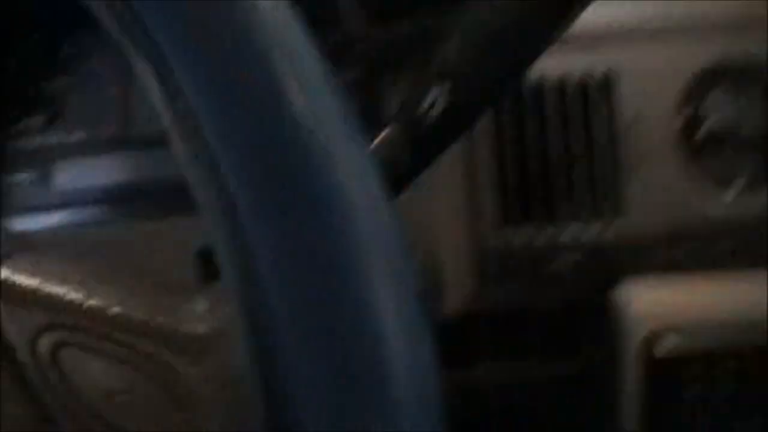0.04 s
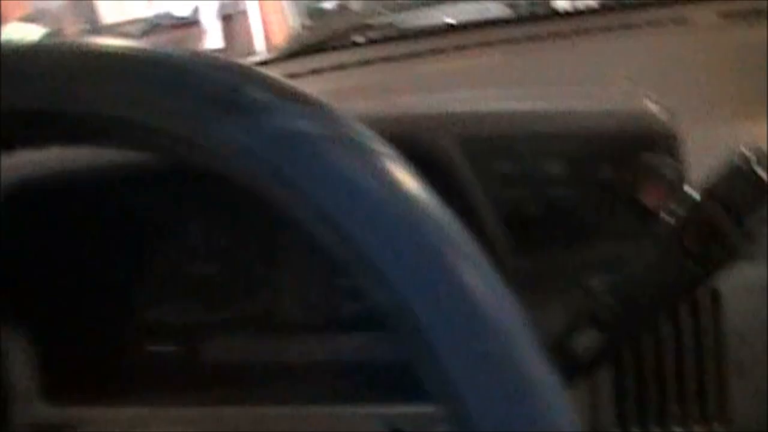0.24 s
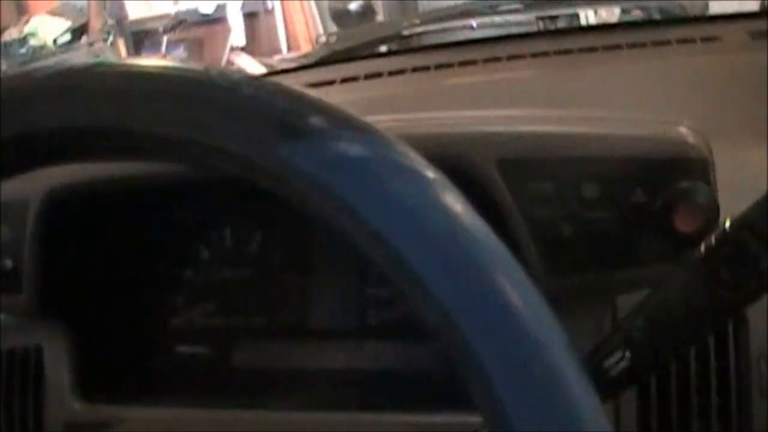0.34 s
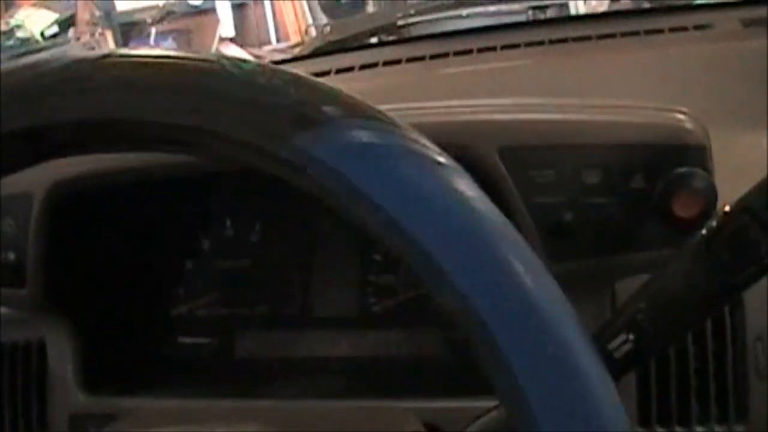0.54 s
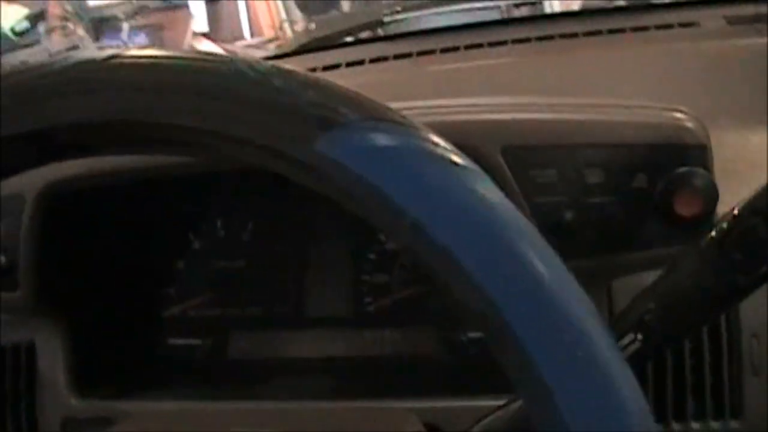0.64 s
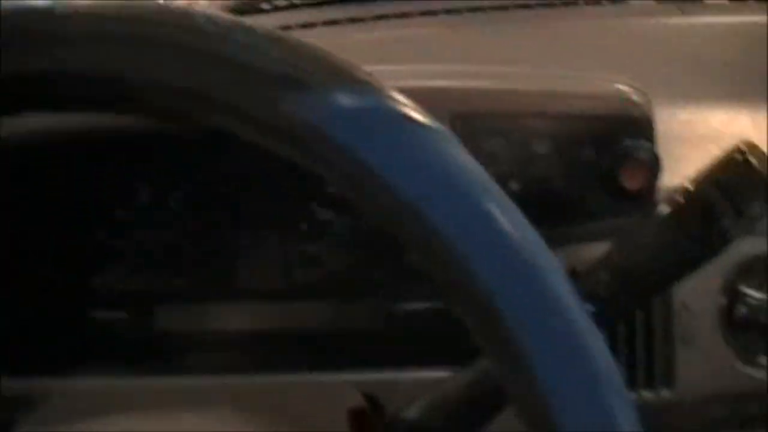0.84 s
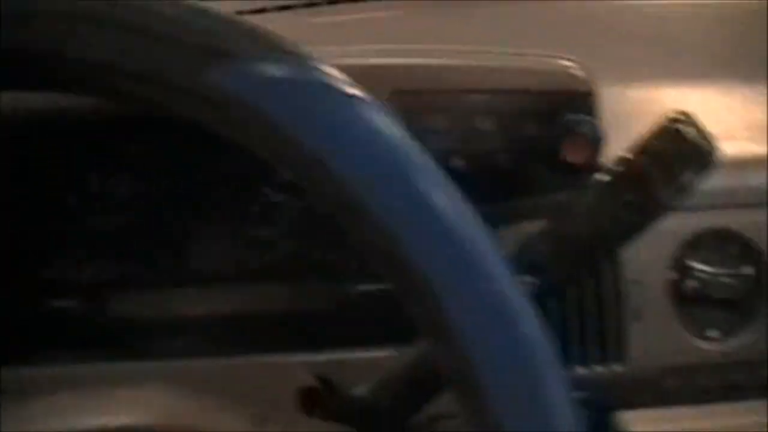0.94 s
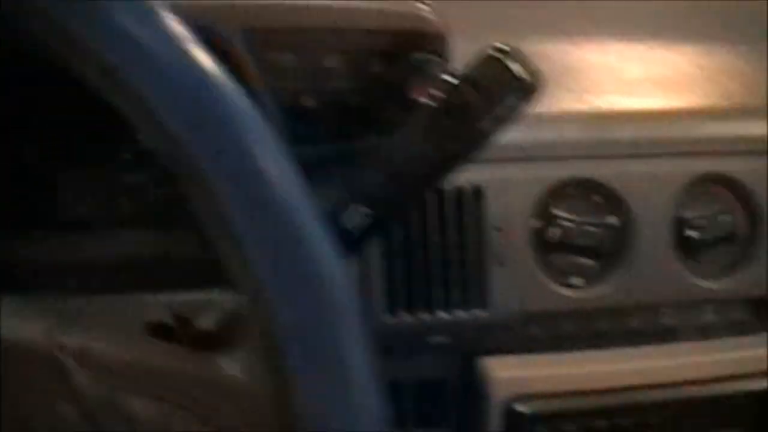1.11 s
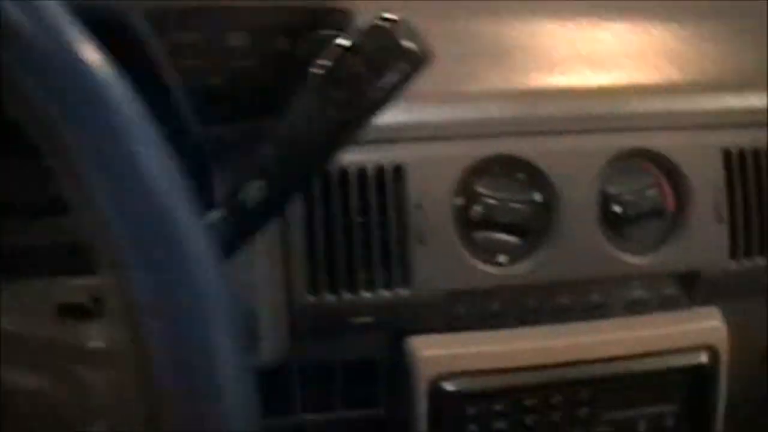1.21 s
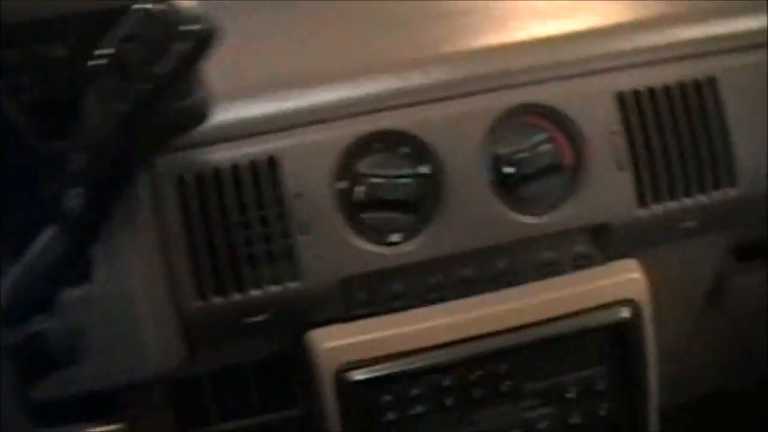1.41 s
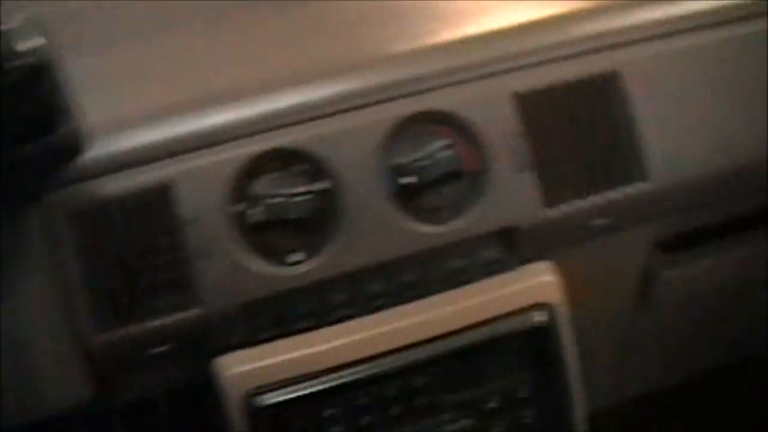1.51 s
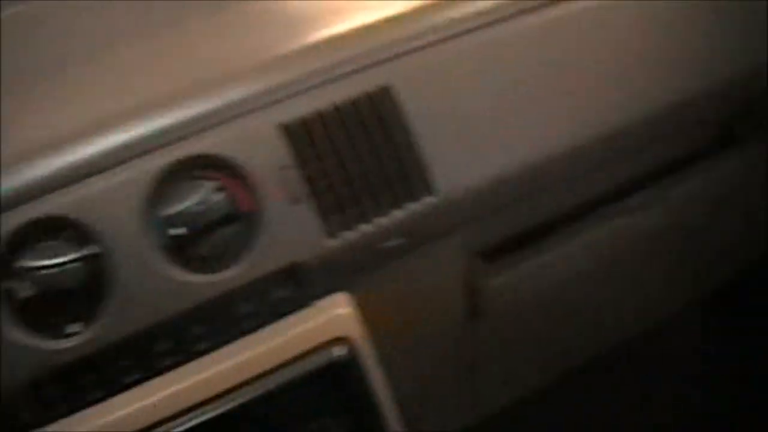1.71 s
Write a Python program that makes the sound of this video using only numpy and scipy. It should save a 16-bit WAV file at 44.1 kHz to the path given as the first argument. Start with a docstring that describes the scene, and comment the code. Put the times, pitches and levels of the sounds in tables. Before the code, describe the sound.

Keys jingle in bright flurries inside a parked truck cabin after the door slams and booms

```python
"""In the cabin of a parked truck someone settles in: clothes rustle, the door judders and thuds shut, the air booms.
Close to the microphone a ring of keys clashes in flurries, slides and clicks dryly; fingers rub on it.
Loose trim rattles after the thud and a soft knock on the trim comes near the end, over a faint background.
Struck bodies are decaying sines plus dying noise bursts; friction is coloured noise under a moving level;
the boom is one low sine with rumble."""
import sys
import numpy as np
from scipy.fft import rfft, irfft, next_fast_len
from scipy.io import wavfile
from scipy.ndimage import uniform_filter1d

SR = 44100
rng = np.random.default_rng(int(sys.argv[2]) if len(sys.argv) > 2 else 0)


def file_out(sig):
    """Save sig as 16-bit WAV at sys.argv[1]."""
    # one column per channel
    cols = np.atleast_2d(sig).T
    # limit, then scale
    lim = np.clip(cols, -1, 1)
    pcm = np.round(lim * 32767).astype(np.int16)
    wavfile.write(sys.argv[1], SR, pcm)


N = 77175  # length in samples
T = np.arange(8192) / SR  # time within one impact, s


def amp(db):
    """Decibel law: level to amplitude ratio."""
    return 10 ** (np.asarray(db) / 20)


def unit(x):
    """Normalization to an rms of 1."""
    return x / np.sqrt(np.mean(x ** 2) + 1e-20)


def along(points, hz):
    """Interpolation of (pitch_hz, value) points on a logarithmic frequency axis."""
    f, v = np.transpose(points)
    return np.interp(np.log(hz + 1), np.log(f + 1), v)


def level(rows):
    """Amplitude envelope: gain per sample, interpolated in decibels from (start_s, level_db) rows."""
    return amp(np.interp(np.arange(N) / SR, *np.transpose(rows)))


def fade(t60):
    """Exponential decay: 60 dB down after t60 seconds."""
    return np.exp(-np.log(1000) * T / t60)


# Likeness of the left and right noise: pitch_hz, correlation
EAR_LIKENESS = [(100, .98), (600, 0.89), (1500, 0.81), (3000, 0.89), (6000, 0.61), (11000, 0.064)]
PARTIAL_WIDTH_HZ = 110


def noise(spectrum, size, ripple_db=0):
    """Filtered noise, rms 1: mid and side shares set the stereo correlation, ripple forms random partials."""
    hz = np.fft.rfftfreq(size, 1 / SR)
    turn = np.arccos(np.clip(along(EAR_LIKENESS, hz), -1, 1)) / 2
    knots = SR // PARTIAL_WIDTH_HZ
    ripple = np.interp(hz / PARTIAL_WIDTH_HZ, np.arange(knots), rng.standard_normal(knots))
    colour = amp(along(spectrum, hz) + ripple_db * ripple)
    white = rfft(rng.standard_normal((2, size)))
    mid, side = irfft(white * colour * [np.cos(turn), np.sin(turn)], size)
    return unit(np.array([mid + side, mid - side]))


def burst(spectrum, t60):
    """High modal density: a dying crowd of modes acts as decaying noise, starting at rms 1."""
    x = noise(spectrum, len(T)) * fade(t60)
    return unit(x) * np.sqrt(np.mean(fade(t60) ** 2))


def add(track, s, x):
    """Superposition: mix x into the track at time s."""
    part = track[:, max(round(s * SR), 0):][:, :x.shape[-1]]
    part += x[..., :part.shape[1]]


def blows(rows, spectrum, t60, modes=(), rise_s=0.00048):
    """Impact excitation: each blow is a fresh burst plus the modal ring of the struck body."""
    out = np.zeros((2, N))
    ring = sum(amp(mode_db) * fade(life) * np.sin(2 * np.pi * hz * T) for hz, mode_db, life in modes)
    attack = 1 - np.exp(-T / rise_s)  # a longer rise is a softer contact
    for s, db in rows:
        add(out, s, amp(db) * attack * (burst(spectrum, t60) + ring))
    return out


def soft_ring(hz, rise, t60):
    """Single-mode resonance with a rounded attack."""
    return (1 - np.exp(-T / rise)) * fade(t60) * np.sin(2 * np.pi * hz * T)


def grainy(spectrum, grain_db, size):
    """Amplitude modulation: random smoothed level swings make noise grainy; size in samples, rms 1."""
    swing = unit(uniform_filter1d(rng.standard_normal(N), size=size))
    return unit(amp(grain_db * swing) * noise(spectrum, N))


# Spectrum of the faint background: pitch_hz, level_db
FLOOR = [(25, -3), (200, -6), (384, -2), (545, -8), (1800, -14), (5000, -19), (11000, -17.5), (16000, -34)]


def background():
    """Stationary noise: a faint, steady floor."""
    return amp(-49) * noise(FLOOR, N)


# Clothes rubbing on the seat: start_s, level_db
RUSTLING = [(0, -35.5), (.11, -35), (.17, -30.5), (.23, -30.5), (.26, -27.5), (.285, -23), (.31, -27.5),
            (.35, -27), (.45, -28.5), (.52, -32), (.6, -40.5), (.7, -43), (.76, -50), (1.2, -52.5),
            (1.75, -56.5)]
# Spectrum of the rubbing cloth: pitch_hz, level_db
CLOTH = [(40, -13), (150, -1.5), (400, -0.5), (700, -4.5), (1000, -2.5), (1800, -8.5), (3000, -16),
         (7000, -22.5), (11000, -25), (15000, -46)]
# Quick sleeve strokes: start_s, length_s, level_db
SWISHES = [(0.237, 0.079, -33), (0.424, 0.044, -31.5)]
# Spectrum of the sleeve strokes: pitch_hz, level_db
SWISH = [(1000, -6), (4000, -4), (7500, -0.5), (11000, -5.5), (15000, -24)]


def clothes():
    """Friction noise: grainy rubbing on the seat, with brighter swishes that swell and sink."""
    t = np.arange(N) / SR
    strokes = np.zeros(N)
    for s, length, db in SWISHES:
        progress = np.clip((t - s) / length, 0, 1)
        strokes += amp(db) * np.sqrt(np.abs(np.sin(np.pi * progress)))
    rubbing = grainy(CLOTH, grain_db=1.56, size=200)
    return rubbing * level(RUSTLING) + strokes * noise(SWISH, N)


# Hands and seat shifting: start_s, level_db
SHIFTING = [(0, -42), (.22, -43.5), (.29, -36), (.36, -39.5), (.7, -45), (.95, -50), (1.1, -50),
            (1.2, -42.5), (1.32, -46.5), (1.42, -48), (1.55, -59), (1.68, -52.5), (1.75, -47.5)]
# Spectrum of the shifting: pitch_hz, level_db
SHIFT = [(20, -14), (60, -9), (110, 2), (200, -8), (280, -8.5), (390, -3), (550, -9.5), (1200, -20.5),
         (4000, -34)]


def shifting():
    """Friction noise, low and hollow, as the person moves."""
    return noise(SHIFT, N) * level(SHIFTING)


# Ringing modes of the keys: pitch_hz, level_db (relative), t60_s
KEY_MODES = [(2130, -20, 0.04), (5350, -18, 0.17), (6520, -14.5, 0.12), (6910, -7, 0.13), (7870, -8.5, .08),
             (8750, -7.5, 0.093), (9270, -16, 0.11), (10840, 1.5, 0.055), (11180, -3.5, 0.1),
             (11400, -0.5, 0.096), (12000, -9, 0.072), (13300, -10, .1), (14700, -17, .11),
             (15250, -14, .11)]
# Spectrum of the keys' crowd of short-lived modes: pitch_hz, level_db
CLINK = [(300, -32), (1500, -24), (2200, -14.5), (3200, -16), (4800, -12), (6700, -2.5), (9800, -2.5),
         (11200, 3.5), (12300, 0), (13800, -9), (15000, -6.5), (16000, -12)]
RING_DB, KEY_DETUNE, MODE_SCATTER_DB = -1.5, .0025, 4.5  # detune: relative spread of each mode's pitch
CLINK_DB, CLINK_T60_S, TICK_DB, TICK_T60_S = -0.06, 0.066, -13.52, 0.0059


def key_strike():
    """Modal superposition: a tick, a short clink and ringing modes that differ at each ear."""
    hz, db, t60 = np.transpose(KEY_MODES)[:, :, None]
    gain = unit(amp(db + MODE_SCATTER_DB * rng.standard_normal(hz.shape)))
    gain = gain / np.sqrt(len(hz) / 2)  # summed modes start near rms 1
    detuned_hz = hz * (1 + KEY_DETUNE * rng.standard_normal(hz.shape))
    cycles = detuned_hz * T + rng.random((2, len(hz), 1))  # random phase per ear
    ring = (gain * fade(t60) * np.sin((2 * np.pi * cycles).astype(np.float32))).sum(axis=1)
    decay = amp(CLINK_DB) * fade(CLINK_T60_S) + amp(TICK_DB) * fade(TICK_T60_S)
    clink = noise(CLINK, len(T), ripple_db=6) * decay  # each contact favours its own partials
    return amp(RING_DB) * ring + clink


# How hard the keys slide over each other: start_s, level_db
SLIDING = [(0, -77), (.5, -55), (.57, -30), (.6, -55), (.715, -66), (.73, -39), (.76, -40), (.785, -28),
           (.815, -48), (.85, -33), (.9, -32), (.96, -29), (1.0, -36.5), (1.1, -30), (1.15, -32.5),
           (1.25, -53), (1.285, -30), (1.308, -40), (1.32, -30), (1.35, -26.5), (1.4, -31.5), (1.44, -25),
           (1.48, -29), (1.5, -48), (1.58, -40), (1.64, -42), (1.72, -58), (1.75, -62)]
CONTACTS_PER_S, CONTACT_SCATTER_DB = 480, 3


def key_sliding(count=12):
    """Friction as a random train of small impacts, drawn in turn from a few strikes."""
    out, sliding = np.zeros((2, N)), level(SLIDING)
    strikes = [key_strike() for _ in range(count)]
    energy = np.mean(np.sum(np.square(strikes), axis=2))
    scale = np.sqrt(SR / CONTACTS_PER_S / energy)  # brings the dense patter near rms 1
    for k in range(round(N / SR * CONTACTS_PER_S)):
        s = (k + 2 * rng.random()) / CONTACTS_PER_S
        scatter_db = CONTACT_SCATTER_DB * (rng.exponential() - 2)  # few contacts are strong
        if s * SR < N:
            add(out, s, scale * sliding[int(s * SR)] * amp(scatter_db) * strikes[k % count])
    return out


# Keys clashing: start_s, level_db
CLASHES = [(.097, -45), (0.124, -35), (.134, -32), (.149, -31), (0.524, -32.5), (.534, -30.5),
           (.552, -34.5), (0.57, -27.5), (0.596, -37), (.621, -25.5), (.717, -30.5), (0.763, -23.5),
           (.769, -16.5), (.774, -16.5), (0.785, -19.5), (.797, -14.5), (.802, -19.5), (.871, -24.5),
           (.876, -19.5), (.887, -30), (0.917, -28), (.9255, -26), (.942, -20.5), (0.9454, -14.5),
           (.953, -16.5), (.959, -22), (.97, -25), (1.015, -26), (1.039, -29.5), (1.079, -24.5),
           (1.085, -20), (1.091, -24), (1.106, -23.5), (1.116, -32), (1.152, -32), (1.161, -31.5),
           (1.203, -32), (1.207, -28.5), (1.218, -30.5), (1.274, -32.5), (1.286, -31), (1.313, -27),
           (1.336, -31), (1.345, -28), (1.352, -24), (1.4093, -17), (1.428, -24), (1.44, -21.5),
           (1.449, -26), (1.461, -25.5), (1.478, -25.5), (1.61, -29), (1.628, -36.5), (1.666, -33),
           (1.673, -33), (1.742, -44)]
# A single key or the ring singing out: start_s, pitch_hz, level_db
PINGS = [(.569, 6580, -24.5), (.947, 2064, -22.5), (1.04, 4420, -24.5), (1.668, 13480, -30)]
# Dry clicks of keys held tight: start_s, level_db
CLICKS = [(.395, -16), (.463, -21), (.575, -27), (.795, -21), (.881, -32), (.949, -24.5), (1.015, -29),
          (1.071, -19), (1.0845, -24), (1.1823, -27.5), (1.2736, -26), (1.286, -31), (1.522, -35),
          (1.5435, -29), (1.5538, -21.5), (1.559, -31), (1.611, -36), (1.627, -32)]
# Spectrum of dry contact, for clicks and fingers: pitch_hz, level_db
CLICK = [(200, -29), (900, -7.5), (1600, -5.5), (2300, -2), (3500, -2.5), (6000, -1), (10000, -7.5),
         (16000, -19)]
KEY_LEFT_DB = 1.2  # left up and right down by this much


def keys():
    """Modal excitation: clashes and pings ring freely over the sliding; damped clicks do not ring."""
    out = key_sliding()
    for s, db in CLASHES:
        add(out, s, amp(db) * key_strike())
    for s, hz, db in PINGS:
        add(out, s, amp(db) * soft_ring(hz, rise=0.0013, t60=.045))
    clicks = blows(CLICKS, CLICK, t60=0.022, rise_s=.0001)
    return out * amp([[KEY_LEFT_DB], [-KEY_LEFT_DB]]) + clicks


# The door sticking and slipping as it swings: start_s, level_db
SLIPS = [(.174, -26), (.183, -13), (.1917, -15), (0.2001, -15), (.209, -19.5), (.217, -33)]
# Spectrum of a slip: pitch_hz, level_db
SLIP = [(40, -22), (120, -10), (220, -10.5), (350, 3.5), (650, -10), (950, -2.5), (1150, -6.5),
        (1450, -5.5), (2400, -20), (5000, -26), (10000, -26), (15000, -41)]
# Ringing modes of a slip: pitch_hz, level_db, t60_s
SLIP_MODES = [(117, -3.5, 0.051), (270, -7.5, 0.044), (372, 0, 0.018), (970, -2, 0.04)]
SLIP_T60_S, SLIP_ALIKE = 0.043, 0.63  # alike: power share of the burst and ring that repeats


def door_judder():
    """Stick-slip: slips excite the same resonances a little differently, giving a rough low pitch."""
    out = np.zeros((2, N))
    body = blows([(0.00026, 0)], SLIP, SLIP_T60_S, SLIP_MODES)[:, :len(T)]
    for s, db in SLIPS:
        fresh = burst(SLIP, SLIP_T60_S)
        add(out, s, amp(db) * (np.sqrt(SLIP_ALIKE) * body + np.sqrt(1 - SLIP_ALIKE) * fresh))
    return out


# The latch catching: start_s, level_db
LATCH_HITS = [(.3725, -16), (.376, -2.5), (.381, -11), (.387, -8), (.392, -5.5), (.398, -8.5), (.429, -13),
              (.435, -15), (.448, -18)]
# Spectrum of a latch hit: pitch_hz, level_db
LATCH = [(40, -19), (180, -1), (420, -4), (620, 3), (780, 4), (1000, -10), (1700, -10.5), (2400, -13.5),
         (3500, -28), (7000, -29.5), (11000, -34), (15000, -52)]
# Ringing modes of the latch: pitch_hz, level_db, t60_s
LATCH_MODES = [(439.2, -14.5, 0.16), (586.2, -9, 0.19), (711, -14, 0.17), (773, -14.5, 0.096)]


def door_latch():
    """Impact excitation: a quick run of hits rings the latch modes."""
    return blows(LATCH_HITS, LATCH, t60=0.039, modes=LATCH_MODES)


# The cabin air booming after the door shuts: start_s, level_db
BOOMING = [(0, -57), (.355, -56), (.38, -21.5), (.48, -23.5), (.555, -14.5), (.595, -25.5), (.65, -23),
           (.71, -25), (.745, -36.5), (.82, -34.5), (.87, -50), (.92, -39), (1.15, -49), (1.3, -56),
           (1.75, -62)]
BOOM_HZ, RUMBLE_DB = 51.04, -4  # rumble rms relative to the tone


def cabin_boom():
    """Cavity resonance: the shut-in air swells at its lowest mode and dies away with some rumble."""
    tone = unit(np.sin(2 * np.pi * BOOM_HZ * np.arange(N) / SR))
    rumble = noise([(15, -12), (30, -4.5), (60, -2), (110, -2), (210, -7.5), (350, -25.5), (2000, -76)], N)
    return level(BOOMING) * (tone + amp(RUMBLE_DB) * rumble)


# The door seating and its panel shaking: start_s, level_db
THUDS = [(.392, -11), (.425, -11), (.433, -10.5), (.452, -12.5), (.505, -19), (.535, -19), (.62, -31),
         (.79, -35), (.94, -44), (1.18, -36)]
# Spectrum of a thud: pitch_hz, level_db
THUD = [(25, -16), (70, -1.5), (120, 3), (200, 0.5), (330, -5.5), (600, -14), (1200, -20.5), (2500, -30),
        (8000, -60)]
# Ringing modes of the panel: pitch_hz, level_db, t60_s
THUD_MODES = [(115, -5.5, 0.19), (186.4, -8.5, 0.19), (214, -11, .35)]


def door_thud():
    """Panel vibration: heavy blows ring the door's low modes."""
    return blows(THUDS, THUD, t60=0.14, modes=THUD_MODES)


# Loose trim rattling after the thud: start_s, level_db
RATTLES = [(.483, -22.5), (.503, -23.5), (.532, -29), (.574, -24), (.592, -30), (.642, -28), (.665, -33.5),
           (.702, -30), (1.2, -35)]
# Spectrum of a rattle: pitch_hz, level_db
RATTLE = [(100, -16), (400, -4), (620, 6), (850, -7.5), (1150, 1.5), (1700, -8.5), (3000, -19.5),
          (10000, -50)]


def trim_rattle():
    """Repeated impact: the loose trim gives short bursts without a clear mode."""
    return blows(RATTLES, RATTLE, t60=0.046)


# Fingers rubbing on the keys: start_s, level_db
RUBBING = [(0, -69), (.7, -55), (.78, -37), (.83, -45), (.9, -38), (1.0, -43), (1.05, -36), (1.12, -44),
           (1.24, -48), (1.29, -43.5), (1.47, -47.5), (1.51, -56), (1.58, -47), (1.63, -45), (1.75, -56)]


def fingers():
    """Friction noise: fine dry scratching of skin and metal."""
    return grainy(CLICK, grain_db=3, size=90) * level(RUBBING)


def trim_knock():
    """Single-mode resonance: a padded contact rings one hollow mode."""
    out = np.zeros((2, N))
    add(out, 1.667, amp(-17.5) * soft_ring(383, rise=0.0023, t60=.035))
    return out


def scene(cabin_left_db=.5):
    """Superposition: keys and fingers in front, the cabin's duller sounds around them."""
    door = door_judder() + door_latch() + door_thud() + trim_rattle()
    cabin = background() + clothes() + shifting() + door + cabin_boom() + trim_knock()
    return keys() + fingers() + cabin * amp([[cabin_left_db], [-cabin_left_db]])


TOP_HZ = 15750


def record(dry):
    """Saturation and band limiting: peaks round off towards full scale; nothing from TOP_HZ up remains."""
    size = next_fast_len(N + SR // 2)
    rounded = dry / (1 + dry ** 4) ** (1 / 4)
    passed = np.fft.rfftfreq(size, 1 / SR) < TOP_HZ
    return irfft(rfft(rounded, size) * passed, size)[:, :N]


dry = scene()
out = record(dry)
file_out(out)
```